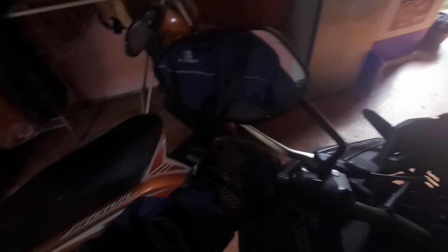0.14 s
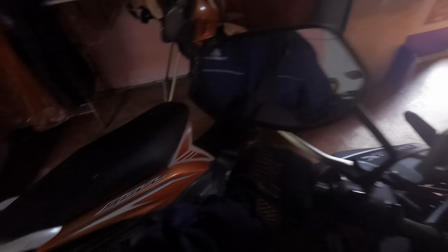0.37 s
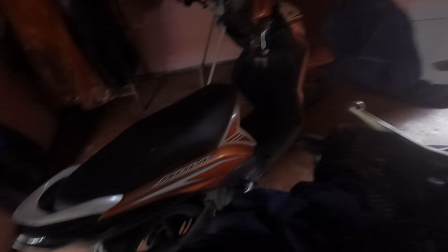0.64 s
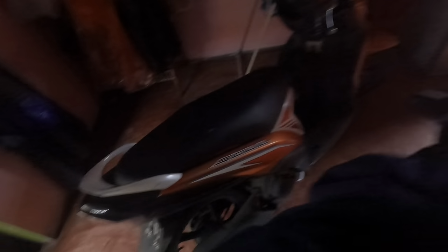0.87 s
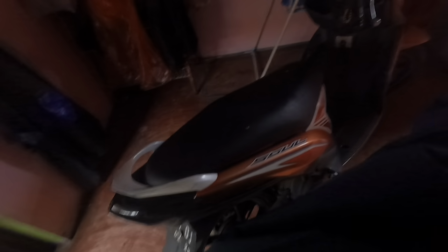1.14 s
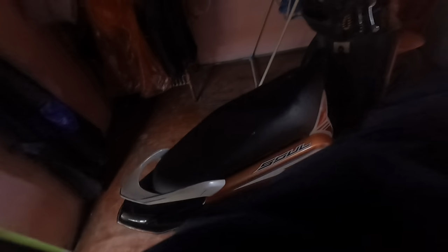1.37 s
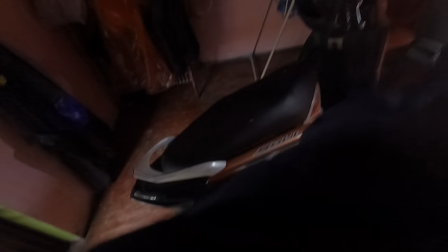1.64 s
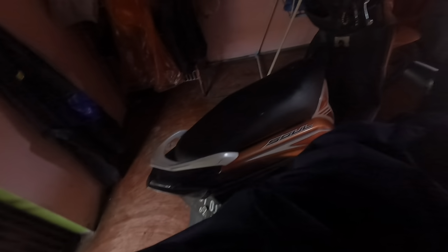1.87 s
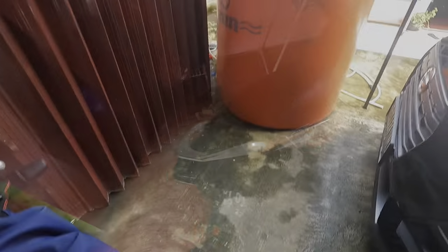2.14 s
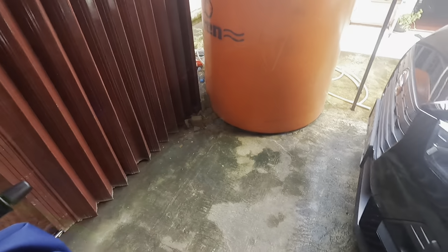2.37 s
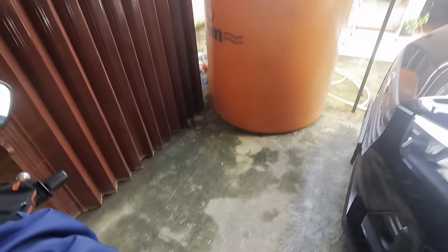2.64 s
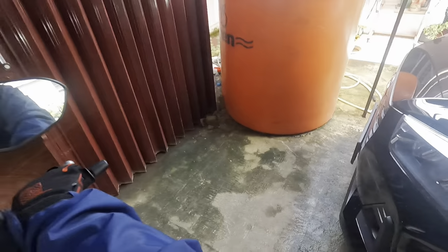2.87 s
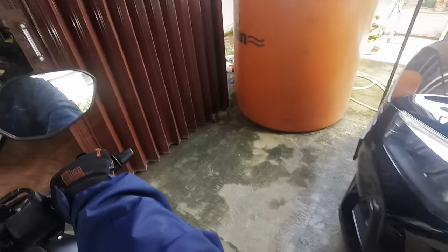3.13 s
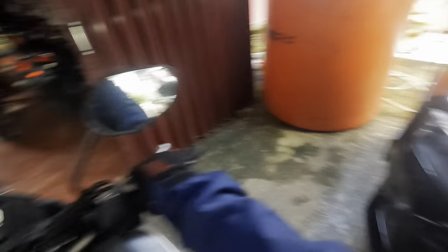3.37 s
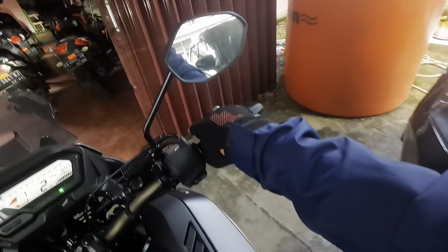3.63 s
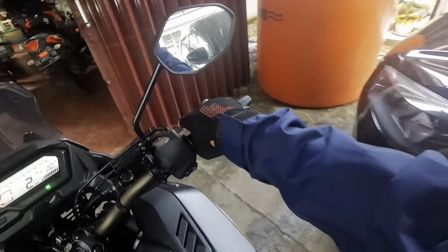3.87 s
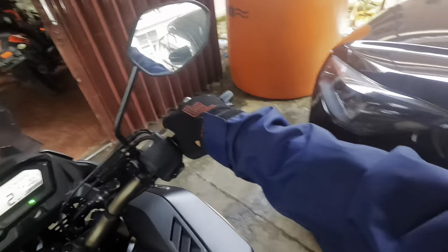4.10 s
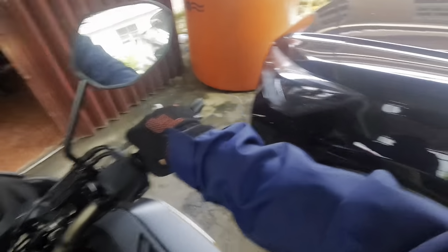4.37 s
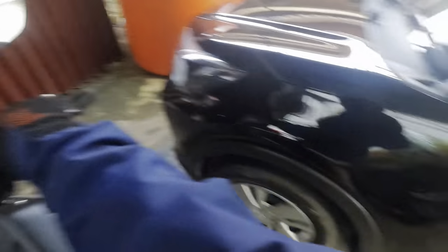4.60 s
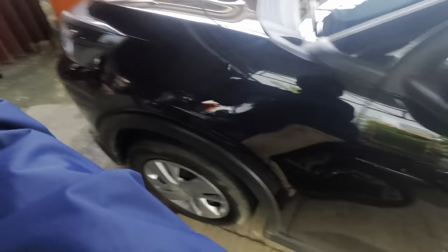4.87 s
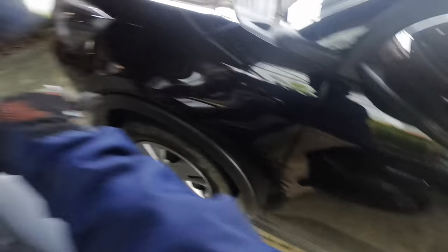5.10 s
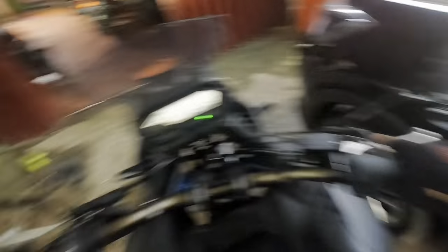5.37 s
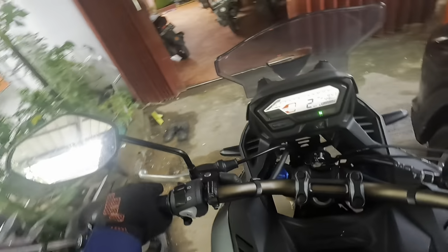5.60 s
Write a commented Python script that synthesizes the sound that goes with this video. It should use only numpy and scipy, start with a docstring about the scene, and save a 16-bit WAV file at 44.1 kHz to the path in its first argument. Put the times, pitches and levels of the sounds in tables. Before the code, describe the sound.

Quiet cloth rustles and small taps in a garage fade into a motorcycle idling steadily, with jacket swishes and sharp buckle and helmet knocks.

```python
"""Helmet microphone, from garage to idling motorcycle

A rider with a helmet microphone shuffles about a quiet garage, which fades into a yard where he walks an idling
single-cylinder motorcycle backwards. Impulses ring exhaust, helmet shell, a hollow box and strap buckle;
shaped noise makes valve-gear clatter, air on the microphone, jacket swish, cloth rub and scuffs.
All of it is in the left channel; the right holds only faint amplifier hiss."""
import sys
import numpy as np
from scipy import signal
from scipy.fft import rfft, irfft, next_fast_len
from scipy.io import wavfile
from scipy.ndimage import uniform_filter1d

SR = 44100
rng = np.random.default_rng(int(sys.argv[2]) if len(sys.argv) > 2 else 0)


def int16_out(signal):
    """Quantize to a 16-bit WAV file."""
    q = np.round(np.clip(np.atleast_2d(signal).T, -1, 1) * 32767)
    wavfile.write(sys.argv[1], SR, q.astype(np.int16))


def linear_from_db(decibels):
    """Turn decibels (scalar or array-like) into linear amplitude factors; 0 gives 1."""
    return 10 ** (np.asarray(decibels, float) / 20)


N = 253134  # samples

# All source levels are ahead of the left gain.
# Engine speed. Each row: time in seconds, firings per second.
ENGINE_SPEED = [(1.8, 13.956), (2.4, 14.728), (2.9, 14.463), (3.15, 14.12), (3.7, 14.259), (4.15, 13.532),
                (4.5, 13.948), (4.75, 13.29), (5.15, 13.886), (5.74, 14.046)]
# Exhaust at the helmet. Each row: time in seconds, level in dB, pipe ring in dB, tail tip ring in dB.
EXHAUST_LEVELS = [(2.15, -24, -4, -6), (2.4, -21, -3.5, -8), (3.2, -21.5, -0.5, -6.5), (3.6, -28.5, 3.5, 3),
                  (3.9, -22.5, -5.5, -6), (4.4, -22, -33, -3.5), (4.8, -20.5, -7, -8), (5.2, -23, -3, -3),
                  (5.74, -23, -5, -2.5)]
# Silencer modes. Each row: frequency in Hz, width in Hz, level in dB, polarity.
SILENCER_MODES = [(27, 4, 0, -1), (48, 10, -3, -1), (85, 8, .5, 1)]
# Tail tip modes. Each row: frequency in Hz, width in Hz, level in dB.
TAIL_TIP_MODES = [(70, 5, -4), (146, 13, 0)]
# Crankcase modes rung by the valve gear. Each row: frequency in Hz, width in Hz, level in dB.
CRANKCASE_MODES = [(454, 15, -14.5), (482, 12, -11.5), (647, 24, -15), (900, 22, -18.5), (1049, 76, -15),
                   (1220, 42, -16), (1317, 9.6, -15), (1674, 18, -16)]
# Valve-gear clatter spectrum. Each row: frequency in Hz, relative level in dB per Hz.
CLATTER_COLOUR = [(210, -39), (350, -13), (645, -1), (824, -3), (906, -1), (1260, -4.5), (1740, -9.5),
                  (1910, -12), (2440, -14), (2720, -17.5), (3480, -19), (9000, -49), (19800, -120)]
# Treble spectrum of jacket and valve ticks. Each row: frequency in Hz, relative level in dB per Hz.
SWISH_COLOUR = [(3500, -46), (4800, -14), (5450, 4), (6800, -3), (7700, -3), (9200, -3.5), (10400, -3),
                (11300, -4), (12200, -7), (13300, -6), (14000, -9), (15600, -6)]
# Knocks on the helmet shell. Each row: time in seconds, blow in dB, rattle in dB, favoured pitch in Hz.
SHELL_KNOCKS = [(.8015, -27, -60, 1250), (.865, -35, -60, 450), (1.241, -33, -52, 420),
                (1.249, -29, -52, 420), (1.263, -32, -54, 360), (1.297, -32, -53, 1550),
                (4.842, -17, -43, 1200), (4.865, -19, -42, 800), (5.119, -23, -44, 1900),
                (5.3275, -15, -35, 1300), (5.5508, -10, -29.5, 750), (5.636, -22, -36, 1800)]
# Helmet shell modes. Each row: frequency in Hz, level in dB.
SHELL_MODES = [(255, -9), (350, -6), (425, -4), (540, -6), (745, -8), (925, -5), (1165, -6), (1600, -8),
               (2350, -8), (3500, -8)]
# A hollow box set down in the garage. Each row: time in seconds, blow in dB, rattle in dB, favoured pitch in Hz.
BOX_KNOCKS = [(1.9117, -15, -41, 700)]
# Modes of that box. Each row: frequency in Hz, level in dB.
BOX_MODES = [(262, -2), (522, -2), (762, -4), (985, -9), (1225, -6), (1800, -12), (2750, -15), (3550, -12)]
# Buckle taps. Each row: time in seconds, tick in dB, ring in dB before a 10.5 dB lift, favoured pitch in Hz.
BUCKLE_TAPS = [(.118, -60, -54, 5400), (.52, -58, -51, 5400), (.622, -39, -58, 8400),
               (1.1484, -52, -38, 2920), (1.3334, -50, -57, 2300), (1.914, -31, -35, 3500),
               (2.9217, -39, -93, 5460), (2.735, -60, -54, 5400), (3.035, -64, -40, 6700),
               (3.229, -60, -37.5, 5400), (3.2631, -61, -49, 5460), (3.418, -32, -29, 3050),
               (3.44, -42, -40, 5540), (3.53, -58, -47, 5400), (3.67, -58, -49, 5450),
               (4.135, -56, -50, 5440), (4.2674, -64, -54, 5470), (4.43, -51, -45, 5450),
               (4.578, -28, -31.5, 2900), (4.6307, -40, -33, 3260), (4.842, -31, -23, 4070),
               (4.864, -35, -31.5, 3500), (4.9144, -47, -41, 4300), (4.993, -55, -41, 3400),
               (5.1186, -37, -28, 3600), (5.327, -23.5, -22, 2530), (5.496, -64, -35, 3300),
               (5.5518, -26, -17, 2450), (5.6365, -35, -21.5, 2930)]
# Strap and buckle modes. Each row: frequency in Hz, time to fall 60 dB in seconds.
BUCKLE_MODES = [(2360, .009), (3020, .007), (3500, .007), (5450, .007), (6700, .005), (8500, .005)]
# Strides in the yard. Each row: start in seconds, hold in seconds, jacket swish in dB, clatter swell in dB
# against its steady level, then the level in dB of each of the three fold resonances.
YARD_STRIDES = [(2.37, 0.21, -62, 7, -83, -65, -65), (3.342, 0.41, -59.5, 7, -72, -75, -65),
                (4.367, 0.2, -64.5, 2.5, -73, -68, -78), (4.63, 0.16, -60, 5.5, -77, -63, -61),
                (4.9, 0.3, -65.5, -32, -70, -70, -90), (5.32, 0.1, -55.5, 7.5, -79, -84, -74),
                (5.543, 0.054, -58.5, 5, -68, -73, -73)]
# Jacket folds. Each row: frequency in Hz, width in Hz of each of two passes.
FOLD_MODES = [(7700, 420), (10400, 1200), (12900, 1100)]
# Gusts on the microphone in the yard. Each row: start in seconds, hold in seconds, level in dB.
YARD_GUSTS = [(3.35, 0.14, -30.5), (3.602, 0.06, -28), (4.708, 0.026, -36), (5.338, 0.057, -31),
              (5.503, 0.11, -41)]
# Gust and breeze spectrum. Each row: frequency in Hz, relative level in dB per Hz.
GUST_COLOUR = [(10, 8), (18, 0), (40, -4), (90, -1), (200, -7.5), (350, -9.5), (600, -19), (1000, -41),
               (1500, -38)]
# Quick movements in the garage. Each row: start in seconds, hold in seconds, cloth rub in dB, jacket swish in dB.
GARAGE_MOVES = [(0.136, 1, -57.5, -71), (0.827, 0.11, -46.5, -59.5), (0.94, 0.13, -48.5, -63),
                (1.15, 0.018, -46, -62.5), (1.201, 0.084, -51, -61.5), (1.28, 0.0067, -46, -72),
                (1.345, 0.012, -45, -63), (1.422, 0.05, -54.5, -65), (1.524, 0.024, -50, -61.5),
                (1.612, .11, -58, -68.5), (1.935, 0.036, -49.5, -64), (2.056, 0.21, -55, -72)]
# Cloth rub spectrum. Each row: frequency in Hz, relative level in dB per Hz.
RUB_COLOUR = [(530, 3.5), (900, 3.5), (1270, -0.5), (1630, 2.5), (2110, 0), (2470, -3), (3640, -1),
              (4830, -14), (6500, -45), (8450, -27), (14300, -120)]
# Stiff cloth resonances. Each row: frequency in Hz, width in Hz, level in dB.
SCRAPE_MODES = [(1600, 200, -4), (2450, 250, -7), (3700, 350, -14)]
# Scuffs in the garage. Each row: start in seconds, hold in seconds, level in dB.
GARAGE_SCUFFS = [(0.206, 0.21, -49), (0.655, 0.48, -49), (1.197, 0.022, -46), (1.244, 0.016, -35),
                 (1.337, .12, -45), (1.533, 0.023, -42), (1.63, 0.087, -49), (2.068, 0.18, -45)]
# Scuff spectrum. Each row: frequency in Hz, relative level in dB per Hz.
SCUFF_COLOUR = [(71, -27), (120, -5), (285, 5.5), (445, 5.5), (538, 4.5), (952, 2.5), (1500, -9),
                (1950, -52.5), (3300, -120)]
# Air on the microphone in the garage. Each row: time in seconds, level in dB.
GARAGE_AIR_LEVEL = [(0, -48), (.06, -48.5), (.18, -30), (.55, -29.5), (.78, -33.5), (1, -46), (1.3, -43),
                    (1.6, -44.5), (1.84, -50.5), (1.95, -27), (2.1, -34.5)]
# Spectrum of that air. Each row: frequency in Hz, relative level in dB per Hz.
AIR_COLOUR = [(10, 17.5), (16, 1), (28, -2), (45, -8.5), (100, -11.5), (200, -18), (350, -22.5), (550, -33),
              (900, -36), (1500, -42.5)]
# Amplifier hiss spectrum. Each row: frequency in Hz, relative level in dB per Hz.
HISS_COLOUR = [(15, -6), (100, -12), (1000, -17.5), (5000, -23.5), (13000, -28), (16000, -27.5)]


def curves(table):
    """Columns of a table, interpolated at every sample."""
    s, *columns = np.transpose(table)
    return [np.interp(np.arange(N) / SR, s, column) for column in columns]


def unit(x):
    """Scale to rms 1."""
    return x / np.sqrt(np.mean(x ** 2))


def walk(rate):
    """Random levels held 1 / rate s and slewed twice; spread 1."""
    hold = int(SR / rate)
    steps = np.repeat(rng.standard_normal(N // hold + 1), hold)
    return unit(uniform_filter1d(uniform_filter1d(steps, hold), hold)[:N])


def ring(x, hz, width_hz):
    """A resonance: each impulse starts a decaying sine of its own height."""
    r, w = np.exp(-np.pi * width_hz / SR), 2 * np.pi * hz / SR
    return signal.lfilter([0, r * np.sin(w)], [1, -2 * r * np.cos(w), r * r], x)


def ringing_noise(hz, width_hz):
    """Steady noise through one resonance, rms 1."""
    return unit(ring(rng.standard_normal(N), hz, width_hz))


def impulses(s, size):
    """Single samples of the given heights at the given times."""
    return np.bincount((np.asarray(s) * SR).astype(int), size, N)[:N]


def noise(colour, lo_hz, hi_hz, flicker_db, shared_db, rate):
    """Coloured noise, rms 1 from lo to hi before its wide bands flicker alone and together."""
    size = next_fast_len(N)
    octave = np.log2(np.arange(1, size // 2 + 2) * SR / size)
    hz, db = np.transpose(colour)
    at = np.log2(hz)
    spectrum = rfft(rng.standard_normal(size)) * linear_from_db(np.interp(octave, at, db, -200, -200))
    inside = (octave > np.log2(lo_hz)) & (octave < np.log2(hi_hz))
    spectrum = spectrum / np.std(irfft(spectrum * inside, size))
    if not flicker_db:
        return irfft(spectrum, size)[:N]
    out = 0
    for centre in np.arange(at[0], at[-1] + 1.5, 1.5):  # overlapping bands, 1.5 octaves apart
        band = np.clip(1 - np.abs(octave - centre) / 1.5, 0, 1)
        out = out + irfft(spectrum * band, size)[:N] * linear_from_db(flicker_db * walk(rate))
    return out * linear_from_db(shared_db * walk(rate))


def swells(start_s, hold_s, db, floor_db, rise_db_s, fall_db_s):
    """Gain of events that rise, hold and fall at steady dB rates, added in power to a floor."""
    t = np.arange(N) / SR
    power = linear_from_db(floor_db) ** 2
    for start, hold, level_db in zip(start_s, hold_s, db):
        before, after = np.clip(start - t, 0, None), np.clip(t - start - hold, 0, None)
        power = power + linear_from_db(level_db - rise_db_s * before - fall_db_s * after) ** 2
    return np.sqrt(power)


def exhaust(cycles):
    """Every firing rings silencer, pipe and tail tip; the ground returns the thump a little later."""
    pipe_hz, pipe_width_hz = 105, 8
    echo_s, echo_db = .0165, -4.5
    level_db, pipe_db, tip_db = curves(EXHAUST_LEVELS)
    fired = np.flatnonzero(np.diff(np.floor(cycles))) / SR + .001
    jitter, low_chance, push_chance = rng.standard_normal((3, len(fired)))
    fired = fired + .0003 * jitter
    low_push = impulses(fired, linear_from_db(.7 * low_chance))  # firings differ in strength
    push = impulses(fired, linear_from_db(1.2 * push_chance))
    thump = linear_from_db(pipe_db) * ring(push, pipe_hz, pipe_width_hz)
    for hz, width_hz, db, polarity in SILENCER_MODES:
        thump = thump + polarity * linear_from_db(db) * ring(low_push, hz, width_hz)
    for hz, width_hz, db in TAIL_TIP_MODES:
        thump = thump + linear_from_db(tip_db + db) * ring(push, hz, width_hz)
    echo = linear_from_db(echo_db) * np.roll(thump, int(echo_s * SR))
    return linear_from_db(level_db) * unit(thump + echo)


def valve_gear(cycles):
    """Clatter noise rings the crankcase and beats with the firing cycle, with a treble tick in each cycle."""
    steady_db, rise_db_s, fall_db_s = -42.5, 30, 13
    tick_db, tick_decay_cycles = -29, .15
    # peaks a twentieth of a cycle ahead of the firing, then fades
    beat = 0.72 + 0.48 * np.exp(-((cycles + .05) % 1) / 0.35)
    rattle = beat * noise(CLATTER_COLOUR, 600, 2000, flicker_db=.6, shared_db=.8, rate=45)
    for hz, width_hz, db in CRANKCASE_MODES:
        rung = unit(ring(beat * rng.standard_normal(N), hz, width_hz))
        rattle = rattle + linear_from_db(db + 2.3 * walk(30)) * rung
    strength = linear_from_db(tick_db + 2.5 * rng.standard_normal(200))[cycles.astype(int)]  # drawn anew each cycle
    tick = strength * np.exp(-((cycles - .1) % 1) / tick_decay_cycles)
    tick = tick * noise(SWISH_COLOUR, 7600, 13500, flicker_db=.5, shared_db=.5, rate=8)
    start, hold, _, swell_db, *_ = np.transpose(YARD_STRIDES)
    gain = swells(start, hold, steady_db + swell_db, steady_db, rise_db_s, fall_db_s)
    return gain * (rattle + tick)


def engine():
    """One count of firing cycles drives both exhaust and valve gear."""
    rate, = curves(ENGINE_SPEED)
    running = np.arange(N) >= ENGINE_SPEED[0][0] * SR
    cycles = np.cumsum(rate * running) / SR
    return exhaust(cycles) + valve_gear(cycles)


def knocks(table, modes, q):
    """Bumps on a hollow thing: a blow, then a rattle that keeps feeding modes, most near the favoured pitch."""
    rattle_decay_s, off_pitch_db_oct = .016, 5
    s, blow_db, rattle_db, pitch_hz = np.transpose(table)
    shake = rng.standard_normal(N)
    tail = np.exp(-np.arange(4000) / SR / rattle_decay_s)
    out = 0
    for k, (hz, level_db) in enumerate(modes):
        db = level_db - off_pitch_db_oct * np.abs(np.log2(hz / pitch_hz))
        blow = impulses(s, linear_from_db(blow_db + db))
        rattle = signal.fftconvolve(impulses(s, linear_from_db(rattle_db + db)), tail)[:N] * shake
        out = out + (-1) ** k * ring(blow + rattle, hz, hz / q)  # modes alternate in polarity
    return out


def clicks():
    """A strap buckle taps the helmet: a crackling tick and six short rings, a little detuned each time."""
    off_pitch_db_oct, tick_top_hz = 27.5, 6700
    s, tick_db, ring_db, pitch_hz = np.transpose(BUCKLE_TAPS)
    burst = np.exp(-np.arange(600) / 70)  # a few milliseconds
    tick = np.convolve(impulses(s, linear_from_db(tick_db)), burst)[:N] * rng.standard_normal(N)
    out = signal.lfilter(*signal.butter(1, tick_top_hz, fs=SR), tick)
    t = np.arange(600) / SR
    rise = 1 - np.exp(-t / 0.0003)  # the contact lasts a fraction of a millisecond
    for at, tap_db, favoured_hz in zip((s * SR).astype(int), ring_db, pitch_hz):
        for hz, t60 in BUCKLE_MODES:
            db = tap_db + 10.5 - off_pitch_db_oct * np.abs(np.log2(hz / favoured_hz))
            detuned_hz = hz * (1 + .02 * rng.standard_normal())
            out[at:at + len(t)] += linear_from_db(db - 60 * t / t60) * rise * np.sin(2 * np.pi * detuned_hz * t)
    return out


def strides():
    """Each stride swishes the jacket: treble noise plus the narrower resonances of its folds."""
    rise_db_s, fall_db_s = 134, 150
    start, hold, swish_db, _, *fold_db = np.transpose(YARD_STRIDES)
    swish = noise(SWISH_COLOUR, 7000, 13500, flicker_db=1, shared_db=1, rate=50)
    out = swells(start, hold, swish_db, -67.5, rise_db_s, fall_db_s) * swish
    for (hz, width_hz), db in zip(FOLD_MODES, fold_db):
        fold = unit(ring(ringing_noise(hz, width_hz), hz, width_hz))
        out = out + swells(start, hold, db, -97, rise_db_s, fall_db_s) * linear_from_db(2 * walk(40)) * fold
    return out


def wind():
    """Air on the microphone in the yard: low noise for a breeze that freshens, swelling in gusts."""
    breeze_db, freshening_db_s = -42, 1.5
    floor_db = breeze_db + freshening_db_s * (np.arange(N) / SR - ENGINE_SPEED[0][0])
    air = noise(GUST_COLOUR, 200, 450, flicker_db=1.2, shared_db=1.5, rate=25)
    return swells(*np.transpose(YARD_GUSTS), floor_db, rise_db_s=60, fall_db_s=39) * air


def yard():
    """The engine close by, the rider's strides and the open air."""
    return engine() + strides() + wind()


def movements():
    """Quick movements rub cloth, whose stiff resonances scrape in turn, and swish the jacket with it."""
    rise_db_s, fall_db_s = 278, 305
    start, hold, rub_db, swish_db = np.transpose(GARAGE_MOVES)
    swish = noise(SWISH_COLOUR, 7000, 13500, flicker_db=.8, shared_db=1.5, rate=40)
    rub = noise(RUB_COLOUR, 1500, 4200, flicker_db=1.5, shared_db=1.1, rate=40)
    for hz, width_hz, db in SCRAPE_MODES:
        scrape = unit(ring(rng.standard_normal(N) ** 3, hz, width_hz))  # cubing makes the noise spiky
        rub = rub + linear_from_db(db + 4 * walk(20)) * scrape
    return (swells(start, hold, rub_db, -63, rise_db_s, fall_db_s) * rub
            + swells(start, hold, swish_db, -74.5, rise_db_s, fall_db_s) * swish)


def scuffs():
    """Scuffs: mid-range noise that swells and falls quickly."""
    scuff = noise(SCUFF_COLOUR, 250, 900, flicker_db=1, shared_db=1.2, rate=35)
    return swells(*np.transpose(GARAGE_SCUFFS), floor_db=-58, rise_db_s=182, fall_db_s=229) * scuff


def garage_air():
    """Air on the microphone indoors: low noise that follows a level curve."""
    level_db, = curves(GARAGE_AIR_LEVEL)
    return linear_from_db(level_db) * noise(AIR_COLOUR, 20, 130, flicker_db=1, shared_db=.8, rate=25)


def whine():
    """A faint high whine: noise through one narrow resonance, wavering in level."""
    hz, width_hz, level_db = 3790, 42, -70
    return linear_from_db(level_db + 2 * walk(3.7)) * ringing_noise(hz, width_hz)


def garage():
    """The rider's shuffling close to the microphone, over the air and whine of the garage."""
    return movements() + scuffs() + garage_air() + whine()


def hiss():
    """Independent amplifier hiss for each channel, dipping 3 dB where the two places overlap."""
    level_db = -71.5
    dip = linear_from_db(-3 * np.exp(-((np.arange(N) / SR - 2.21) / .13) ** 2))
    channels = [noise(HISS_COLOUR, 15, 16000, flicker_db=0, shared_db=0, rate=8) for _ in range(2)]
    return linear_from_db(level_db) * dip * np.array(channels)


def scene():
    """The garage fades into the yard; everything reaches the left channel only."""
    left_gain = 1.218
    t = np.arange(N) / SR
    garage_fade = np.clip((2.3 - t) / 0.16, 0, 1)
    yard_fade = np.clip((t - 1.93) / 0.42, 0, 1)
    left = garage_fade * garage() + yard_fade * yard() + clicks()
    left = left + knocks(SHELL_KNOCKS, SHELL_MODES, q=9) + knocks(BOX_KNOCKS, BOX_MODES, q=14)
    return np.array([left_gain * left, np.zeros(N)])


def top_cut(x):
    """Nothing passes above the cut-off."""
    return signal.sosfilt(signal.butter(12, 15780, fs=SR, output="sos"), x)


def record(dry):
    """The microphone capsule loses the extreme treble and steady pressure; both amplifiers add hiss."""
    capsule = signal.sosfilt(signal.butter(8, 13600, fs=SR, output="sos"), dry)
    capsule = signal.sosfilt(signal.butter(1, 3, "highpass", fs=SR, output="sos"), capsule)
    fade = np.clip((N - np.arange(N)) / (.004 * SR), 0, 1)  # the last milliseconds close softly
    mix = fade * (capsule + hiss())
    return top_cut(mix)


dry = scene()
out = record(dry)
int16_out(out)
```